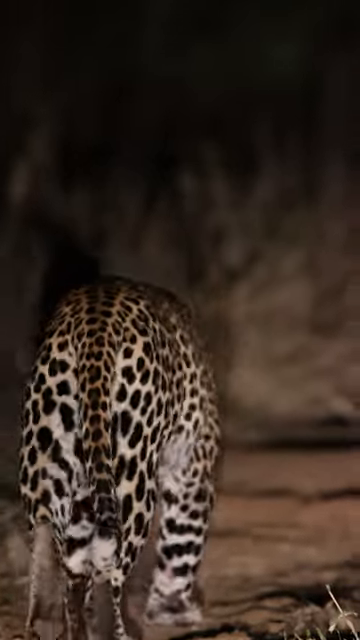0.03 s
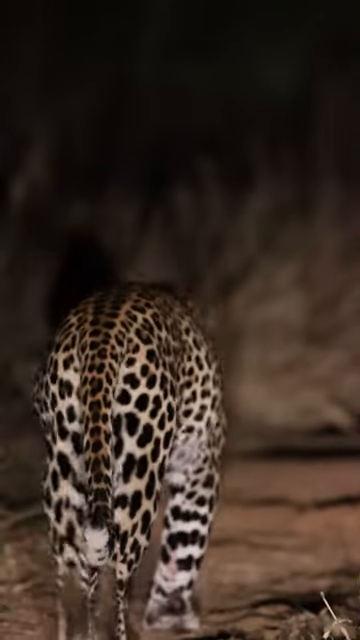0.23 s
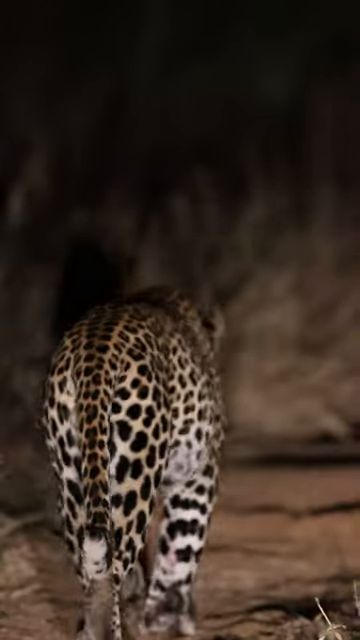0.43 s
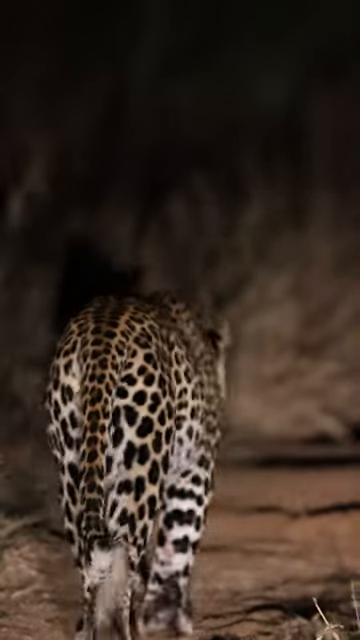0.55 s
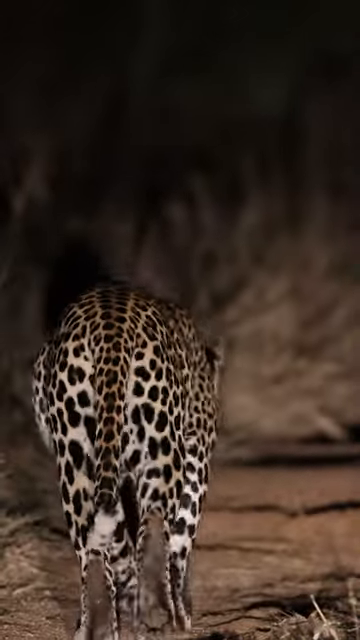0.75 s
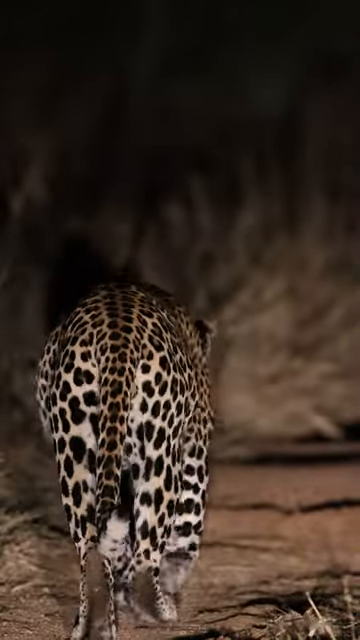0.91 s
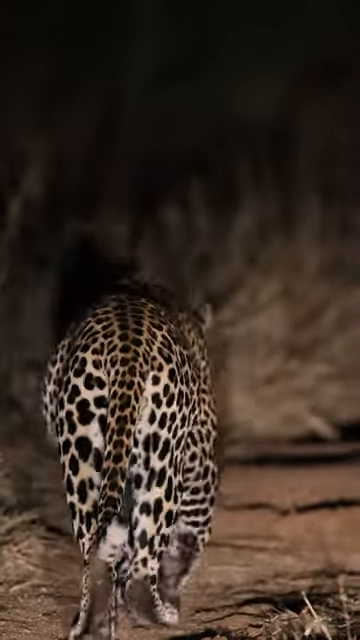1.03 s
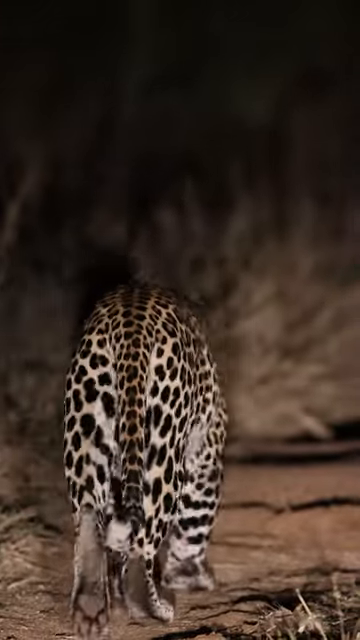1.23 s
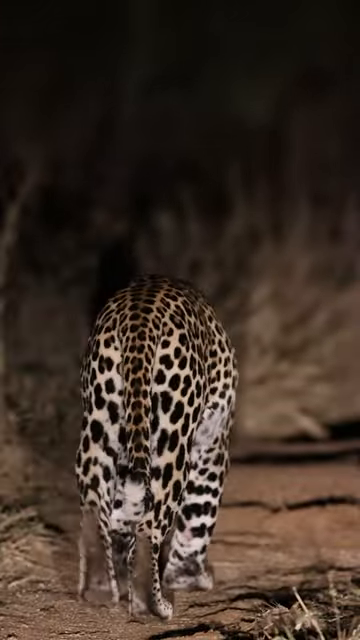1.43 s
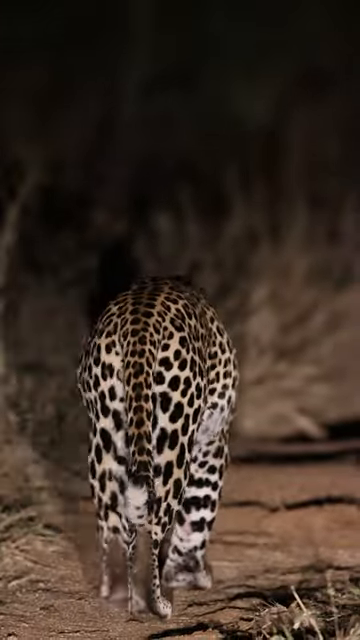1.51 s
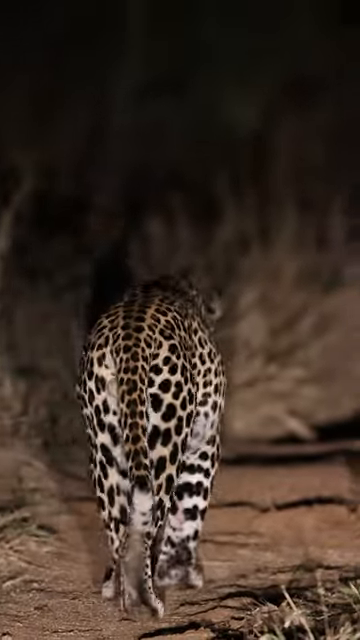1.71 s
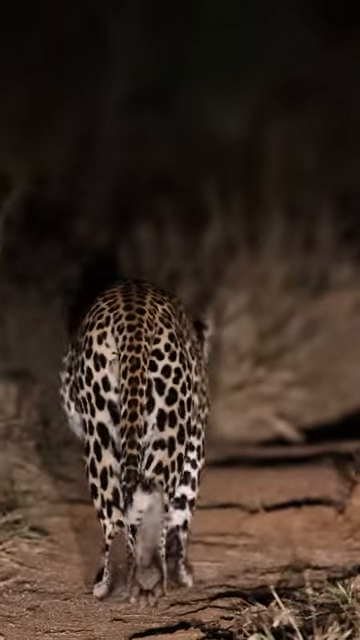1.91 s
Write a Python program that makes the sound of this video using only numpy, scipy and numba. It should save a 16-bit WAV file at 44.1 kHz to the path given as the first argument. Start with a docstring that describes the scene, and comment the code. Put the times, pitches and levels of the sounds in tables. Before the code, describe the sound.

A leopard saws close by in the night bush: three loud, guttural out-breath rasps, each led by a softer, lower in-breath growl. Faint echo, low hiss and a very quiet cricket lie behind; near-centred stereo microphones.

```python
"""The bush at night, with a leopard a little right of centre before a mid-side pair of microphones.
It saws out three rasps: a soft in-breath stroke, then a loud out-breath stroke.
Slow flaps of the vocal folds and puffs of breath ring a deep chest resonance and the throat.
Close scatter and a long faint echo answer from the bush; behind lie night hiss and a chirping cricket."""
import sys
import numpy as np
from scipy import signal
from scipy.fft import rfft, irfft
from scipy.io import wavfile
from numba import njit

SR = 44100
rng = np.random.default_rng(int(sys.argv[2]) if len(sys.argv) > 2 else 0)


def gain_from_decibels(decibels):
    """Convert decibel values to linear amplitude factors."""
    exponent = np.asarray(decibels, float) / 20
    return 10 ** exponent


def int16_out(signal):
    """Quantize to a 16-bit WAV file."""
    q = np.round(np.clip(np.atleast_2d(signal).T, -1, 1) * 32767)
    wavfile.write(sys.argv[1], SR, q.astype(np.int16))


N = 85995
LEAD = SR  # samples kept ahead of time zero, for the stroke before

# Out-breath strokes, one list each: (time [s], flap rate [Hz], chest drive [dB], throat drive [dB],
# relative breath noise [dB], chest resonance [Hz], mouth opening [factor on the throat resonances])
OUT_BREATHS = [
    [(.224, 41.57, -18, -32, -31.5, 190, 0.75), (.248, 44.72, -6, -11.5, -28.5, 193, 1.08),
     (.28, 47.48, -9, -15, -26, 197, 1.06), (.354, 48.58, -12.5, -11.5, -21.5, 195, 0.99),
     (.374, 43.73, -22.5, -30, -29, 190.4, 0.87), (.41, 41.2, -17.5, -52, -39.5, 167, 1.03),
     (.466, 46.7, -30.5, -36, -40, 155, 0.97), (.51, 43, -60, -63, -63, 151, 0.39)],
    [(.88, 60.48, -22, -33, -39, 178, 0.78), (.94, 59.4, -12.5, -28, -29, 205, 1.19),
     (.953, 47.62, -3.5, -11.5, -29, 195, 1.05), (.99, 47.18, -19.5, -17, -24, 192, 0.88),
     (1.012, 46.68, -18, -16, -28, 182.6, 1), (1.04, 36.44, -18.5, -46, -36.5, 167, 0.92),
     (1.1, 50, -26.5, -47, -45, 156, 1.09), (1.16, 45, -84, -53, -60, 156, 0.58)],
    [(1.515, 39.16, -24.5, -36, -50.5, 175, 0.41), (1.54, 41.45, -11.5, -20, -37, 188.5, 1.18),
     (1.575, 45.27, -8, -11, -29.5, 197.4, 1.066), (1.63, 47.13, -10, -17.5, -25, 197.4, 0.994),
     (1.66, 43.59, -17.5, -18, -22.5, 182.5, 0.92), (1.7, 35.85, -20, -31, -39.5, 169, 1),
     (1.77, 28.2, -33.5, -59, -48, 152, 0.99), (1.83, 34, -74, -58, -65, 157, 0.54)],
]
# In-breath strokes, one list each: the same columns
IN_BREATHS = [
    [(.011, 44.55, -36.5, -35, -49.5, 152, 1.08), (.078, 49.15, -19, -37.5, -47.5, 162, 0.94),
     (.118, 52.8, -23, -27, -39, 156, 0.95), (.152, 63, -24, -65.5, -41.5, 155, 0.92),
     (.195, 52.7, -34, -55, -57.5, 141, 0.48)],
    [(.662, 44.64, -28, -35, -58, 161, 1.01), (.729, 46.9, -20, -35, -44.5, 161.7, 1.02),
     (.766, 57.04, -28, -26.5, -46, 155, 0.89), (.801, 58.3, -21, -43, -45, 147, 0.92),
     (.85, 56.1, -51, -46.5, -54, 153, 1.06)],
    [(1.322, 44.53, -23, -35.5, -54.5, 157, 0.88), (1.388, 47.73, -21, -32, -39.5, 166, 1.05),
     (1.425, 57, -23, -29.5, -44.5, 160, 0.86), (1.458, 54.7, -31, -48, -49, 148, 0.82),
     (1.495, 52.7, -27, -62, -53.5, 143.5, 0.73)],
]
# Throat resonances on the out-breath: (frequency [Hz], width [Hz], relative level [dB])
OUT_RESONANCES = [(284.2, 54, -3), (541.3, 49.4, -4), (619, 43, -6), (684, 63, 1), (789, 80, -3.5),
                  (904, 34, -9.5), (1223, 79, -23.5), (1505, 78, -32.5), (1684, 80, -31.5), (1892, 93, -32),
                  (2173, 57, -40), (2406, 160, -36.5), (3586, 150, -42.5), (3900, 2000, -44),
                  (5630, 1300, -44.5), (7700, 2000, -44)]
# Throat resonances on the in-breath: (frequency [Hz], width [Hz], relative level [dB])
IN_RESONANCES = [(288.7, 42, 3.5), (390, 35, -6.5), (560, 55, 3.5), (841, 52, -6), (1412, 71, -26),
                 (1780, 157, -24), (2090, 140, -32.5), (2365, 200, -21.5), (3430, 410, -27.5),
                 (4460, 400, -41)]
# How slowly the far echo dies: (frequency [Hz], time to fall 60 dB [s])
ECHO_T60 = [(100, 1.5), (190, 0.49), (600, 1.9), (1500, 1.3), (4000, 0.61)]
# Colour of the far echo: (frequency [Hz], level [dB])
ECHO_COLOUR = [(100, -1), (190, -22.5), (350, -26.5), (600, -23), (1500, -16.5), (4000, -5.5)]
# Colour of the scatter from nearby ground and scrub: (frequency [Hz], level [dB])
SCATTER_COLOUR = [(300, -32), (600, -18), (1100, -16), (1900, -6), (4000, -9)]
# Night hiss in the mid channel: (frequency [Hz], relative level [dB])
MID_HISS = [(15, -56), (25, -3), (96, -23), (179, 9.5), (316, -23.5), (413, -49.5), (587, -6.5),
            (1010, -19.5), (1730, -21), (15800, -30)]
# Night hiss in the side channel: (frequency [Hz], relative level [dB])
SIDE_HISS = [(15, -48), (25, -16), (110, -12), (189, -30), (299, -22), (2320, -30), (3980, -26),
             (15800, -29)]
# Cricket loudness: (time [s], level [dB])
CRICKET_LEVEL = [(0.0, -72), (0.238, -85), (0.27, -98), (0.504, -76), (0.966, -68), (1.134, -77),
                 (1.384, -68.5), (1.738, -74), (1.802, -83), (1.95, -74)]

# Vocal folds
FLAP_S = 0.00055  # time scale of one softened flap
WEAK_CHEST_DB, WEAK_THROAT_DB = -9, -3  # every other in-breath flap is weaker by this
SIZE_SPREAD_DB = 1.0  # random spread from flap to flap
REBOUND_AT = 0.3973  # a lighter second slap, this share of the way to the next flap
REBOUND_DB, REBOUND_SPREAD_DB = -11, 3.5
PUFF_SHARE, PUFF_FLOOR = 0.39, 0.18  # decay of a puff in flap periods; steady part of the breath

# Chest: rings long in strong strokes, short when slack, around and under SLACK_DB
CHEST_WIDTH_HZ, SLACK_WIDTH_HZ, SLACK_DB = 14.6, 34, -25
SMOOTH_WIDTH_HZ, SLACK_SMOOTH_WIDTH_HZ = 69, 270  # a second resonance rounds the first
TAUT_FROM_HZ = 131.3  # a taut chest gives little below this
CHEST_PUFF_DB = -14

# Throat and mouth
THROAT_PUFF_DB, UPPER_PUFF_DB = -7, 10.5
THROAT_FROM_HZ, UPPER_FROM_HZ = 155, 1024
STEADY_FROM_HZ, UPPER_MOUTH_SHARE = 850, 0.35  # from here up, resonances follow the mouth less
MOUTH_BASS_HZ = 50  # the mouth radiates little below this


def leopard():
    """Breath strokes of three rasps, radiated by the mouth, plus an out-breath before time zero."""
    strokes = [stroke(rows, OUT_RESONANCES, -1, uneven=0) for rows in OUT_BREATHS]
    strokes += [stroke(rows, IN_RESONANCES, 1, uneven=1) for rows in IN_BREATHS]
    first_s, first_sound = strokes[0]
    strokes.append((first_s - 0.65, first_sound))  # before time zero: heard chiefly as echo
    out = np.zeros(LEAD + N + SR)
    for start_s, sound in strokes:
        at = LEAD + round(start_s * SR)
        out[at:at + len(sound)] += sound
    return steep(out, MOUTH_BASS_HZ, "high")


def stroke(rows, resonances, sign, uneven):
    """Fold flaps and the puffs of breath after them drive the chest and the throat."""
    rows = np.array(rows)
    start_s, end_s = rows[0, 0], rows[-1, 0]
    t = np.arange(start_s, end_s + 0.52, 1 / SR)  # leaves time to ring out
    rate_hz, chest_db, throat_db, breath_db, chest_hz, mouth = (
        np.interp(t, rows[:, 0], column) for column in rows.T[1:])
    turns = np.cumsum(rate_hz) / SR
    count = turns.astype(int)
    on = t < end_s

    chest_size, throat_size = gain_from_decibels(SIZE_SPREAD_DB * rng.standard_normal((40, 2))[count]).T
    flaps = sign * on * (np.diff(count, prepend=-1) > 0)
    weak = uneven * (count % 2 == 0)
    again = np.diff(np.floor(turns - REBOUND_AT), prepend=-1) > 0
    rebound_size = gain_from_decibels(REBOUND_DB + REBOUND_SPREAD_DB * rng.standard_normal(40)[count])
    rebounds = sign * on * again * rebound_size

    puff_shape = evened(PUFF_FLOOR + np.exp(-(turns % 1) / PUFF_SHARE))
    puffs = on * gain_from_decibels(breath_db) * puff_shape * rng.standard_normal(len(t)) / 10

    chest_flaps = flaps * chest_size * gain_from_decibels(chest_db + WEAK_CHEST_DB * weak)
    throat_flaps = (flaps + rebounds) * throat_size * gain_from_decibels(throat_db + WEAK_THROAT_DB * weak)
    slack = 1 / (1 + gain_from_decibels(2 * (chest_db - SLACK_DB)))
    slack = np.maximum(slack, uneven)  # always slack on the in-breath
    sound = chest(chest_flaps, puffs, chest_hz, slack) + throat(throat_flaps, puffs, mouth, resonances)
    return start_s, sound


def chest(flaps, puffs, chest_hz, slack):
    """Two gliding resonances in a row, broader when the chest is slack."""
    width_hz = CHEST_WIDTH_HZ + (SLACK_WIDTH_HZ - CHEST_WIDTH_HZ) * slack
    smooth_hz = SMOOTH_WIDTH_HZ + (SLACK_SMOOTH_WIDTH_HZ - SMOOTH_WIDTH_HZ) * slack
    flow = ring(flaps + gain_from_decibels(CHEST_PUFF_DB) * puffs, chest_hz, width_hz)
    flow = ring(flow * 2 * np.pi * smooth_hz / SR, chest_hz, smooth_hz)
    # radiated pressure follows the change of flow
    pressure = np.gradient(flow) * SR / (2 * np.pi * chest_hz)
    return slack * pressure + (1 - slack) * steep(pressure, TAUT_FROM_HZ, "high")


def throat(flaps, puffs, mouth, resonances):
    """Resonances shifted by the mouth: softened flaps feed the lower, raw flaps and more breath the upper."""
    n = np.arange(200)
    soft = np.exp(-n / SR / FLAP_S * 2) * n
    lower_drive = np.convolve(flaps, soft / soft.sum())[:len(flaps)] + gain_from_decibels(THROAT_PUFF_DB) * puffs
    upper_drive = flaps + gain_from_decibels(UPPER_PUFF_DB) * puffs
    lower, upper = np.zeros(len(flaps)), np.zeros(len(flaps))
    for hz, width_hz, db in resonances:
        moved_hz = hz * mouth ** (1 if hz < STEADY_FROM_HZ else UPPER_MOUTH_SHARE)
        if hz < UPPER_FROM_HZ:
            lower += gain_from_decibels(db) * ring(lower_drive, moved_hz, width_hz)
        else:
            upper += gain_from_decibels(db) * ring(upper_drive, moved_hz, width_hz)
    lower = steep(lower, UPPER_FROM_HZ, "low", order=6)
    return steep(lower, THROAT_FROM_HZ, "high") + steep(upper, UPPER_FROM_HZ, "high")


def ring(x, hz, width_hz):
    """A resonance: a unit click becomes a dying sine that starts from height 1."""
    return ring_down(x, np.exp((2j * hz - width_hz) * np.pi / SR) * np.ones(len(x)))


@njit
def ring_down(x, pole):
    """One complex pole that may move from sample to sample."""
    y, state = np.zeros(len(x)), 0j
    for n in range(len(x)):
        state = state * pole[n] + x[n]
        y[n] = state.imag
    return y


def bush(x):
    """Quick scatter nearby and a long far echo whose bands die at their own speeds."""
    hz, t, bands = signal.stft(rng.standard_normal(2 * SR), SR, nperseg=512)
    fade = gain_from_decibels(-60 * t / read(ECHO_T60, hz)[:, None]) * (t > 0.03)  # a gap before the far echo [s]
    band_size = np.sqrt(256 * (fade ** 2).sum(axis=1))[:, None]
    far = signal.istft(bands * fade / band_size, SR, nperseg=512)[1][:2 * SR]

    t = np.arange(2 * SR) / SR
    near = rng.standard_normal(len(t)) * gain_from_decibels(-60 * t / 0.3) * (t > 0.004)  # falls 60 dB in 0.3 s
    near = near / np.linalg.norm(near)
    tail = colour(far, ECHO_COLOUR) + colour(near, SCATTER_COLOUR)
    tail = tail[:-SR // 4]  # leaves off what the filter wraps round to the end
    return signal.fftconvolve(x, tail)[:len(x)]


def cricket():
    """Noise through one narrow high resonance, throbbing in quick chirps."""
    t = np.arange(N) / SR
    chirp_phase = 2 * np.pi * 24.46 * (t - 0.97)  # chirps per second; one peaks at 0.97 s
    throb = evened(np.exp(4.2 * np.cos(chirp_phase)))  # a larger factor sharpens the chirps
    tone = evened(ring(rng.standard_normal(N), 7800, 760))
    return gain_from_decibels(np.interp(t, *np.transpose(CRICKET_LEVEL))) * throb * tone


def hiss(shape, db):
    """Steady night hiss: white noise given a spectrum and an overall rms level."""
    return gain_from_decibels(db) * evened(colour(rng.standard_normal(N), shape))


def colour(x, shape):
    """Filters by a (frequency [Hz], level [dB]) table."""
    return irfft(rfft(x) * gain_from_decibels(read(shape, np.fft.rfftfreq(len(x), 1 / SR))), len(x))


def read(points, hz):
    """Reads a table on a log-frequency axis."""
    f, value = np.transpose(points)
    return np.interp(np.log(hz + 1), np.log(f + 1), value)


def steep(x, hz, kind, order=3):
    """Low-pass or high-pass Butterworth filter."""
    return signal.sosfilt(signal.butter(order, hz, kind, fs=SR, output="sos"), x)


def evened(x):
    """Scales to rms 1."""
    return x / np.sqrt(np.mean(x ** 2) + 1e-20)


def scene():
    """Mid-side pair: cat slightly right of centre with its echo, cricket in the middle, hiss all round."""
    cat = leopard()
    cat = (cat + bush(cat))[LEAD:LEAD + N]
    mid = cat + hiss(MID_HISS, -49.5) + cricket()
    side = hiss(SIDE_HISS, -72.5) - gain_from_decibels(-42.5) * cat  # minus leans to the right
    return np.array([mid + side, mid - side])


def top_cut(x):
    """Nothing passes above the cut-off."""
    return signal.sosfilt(signal.butter(12, 15910, fs=SR, output="sos"), x)


def record(dry):
    """Takes the stereo mix as it stands to its final form."""
    return top_cut(dry)


dry = scene()
out = record(dry)
int16_out(out)
```